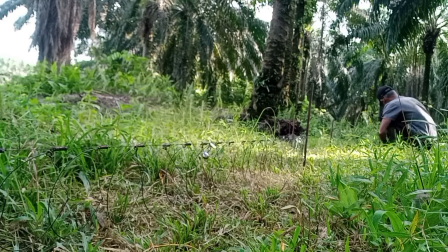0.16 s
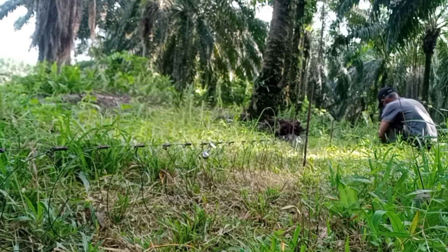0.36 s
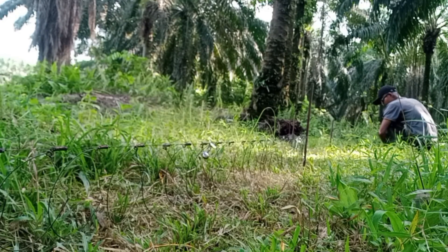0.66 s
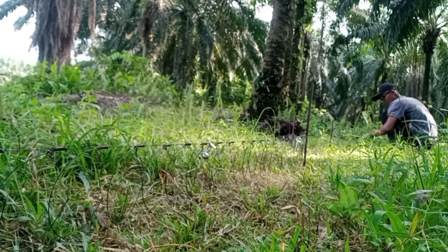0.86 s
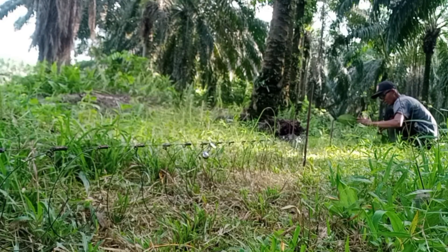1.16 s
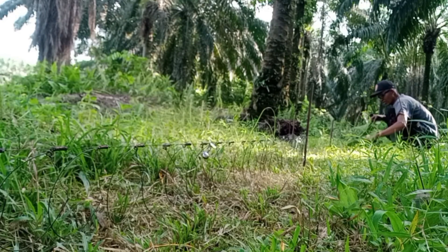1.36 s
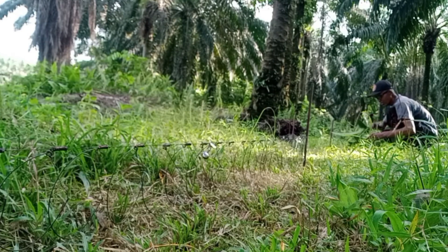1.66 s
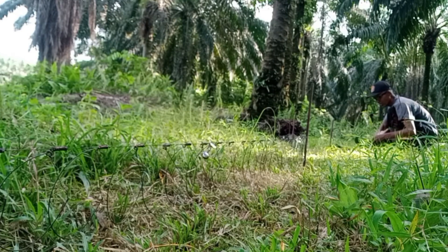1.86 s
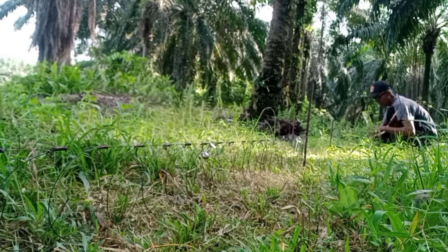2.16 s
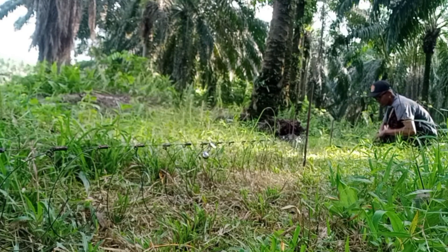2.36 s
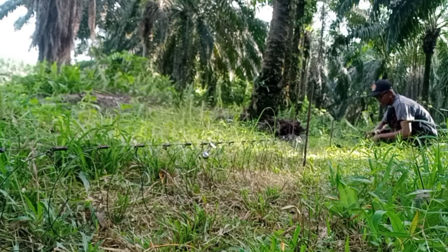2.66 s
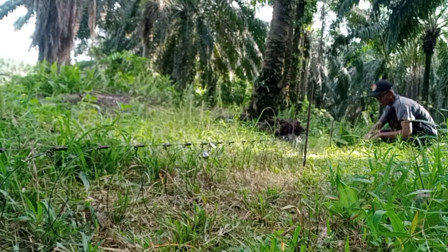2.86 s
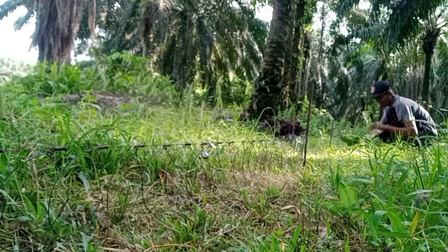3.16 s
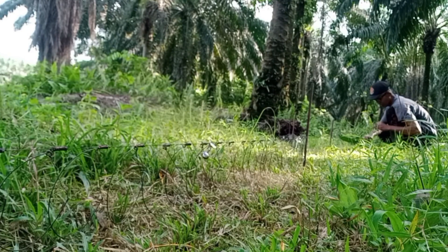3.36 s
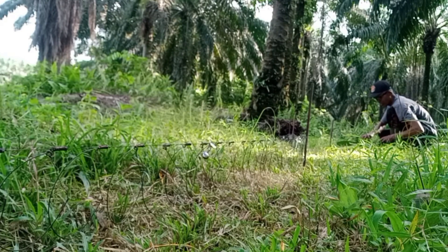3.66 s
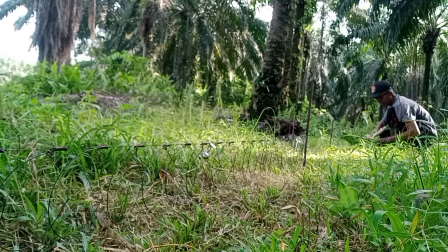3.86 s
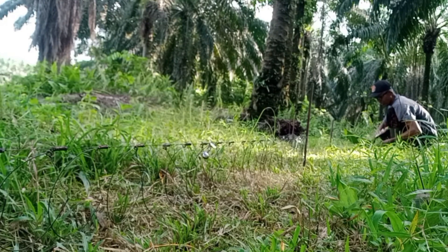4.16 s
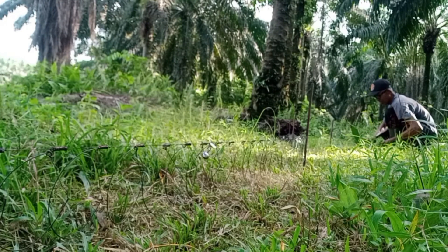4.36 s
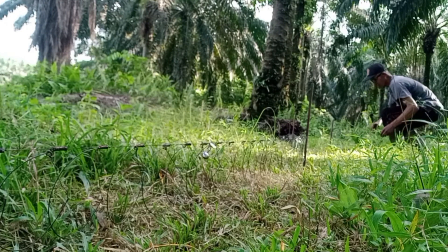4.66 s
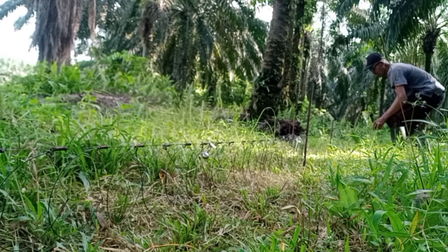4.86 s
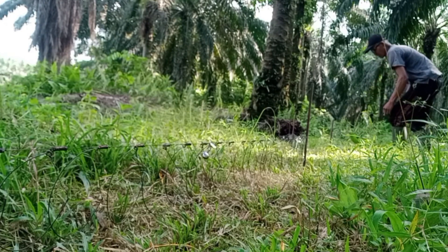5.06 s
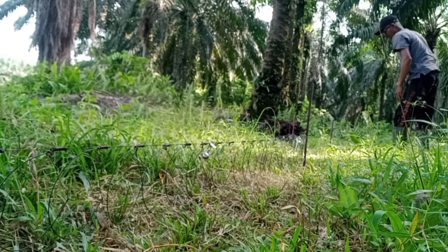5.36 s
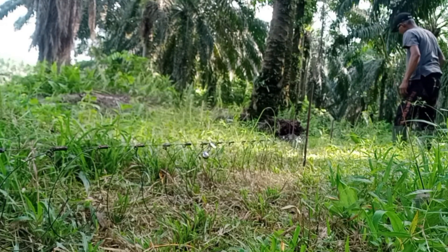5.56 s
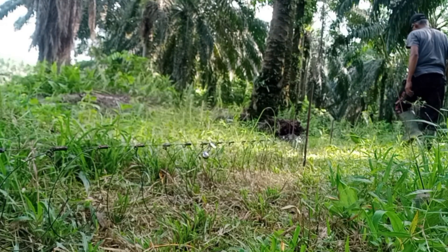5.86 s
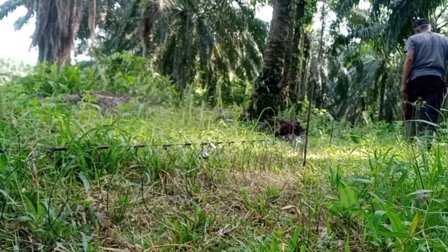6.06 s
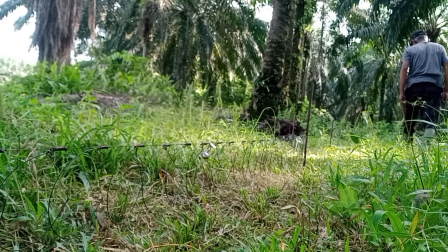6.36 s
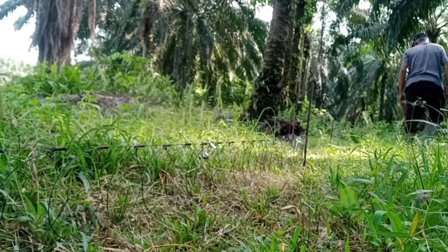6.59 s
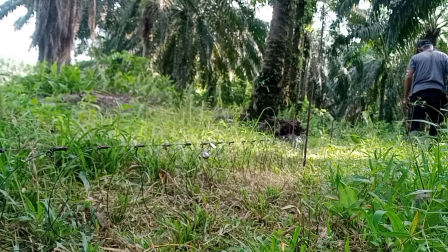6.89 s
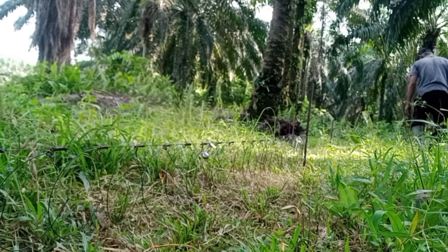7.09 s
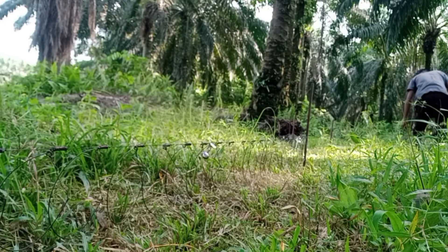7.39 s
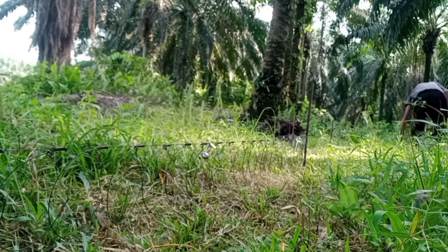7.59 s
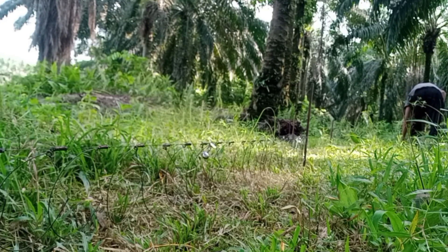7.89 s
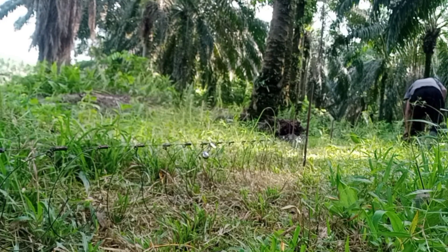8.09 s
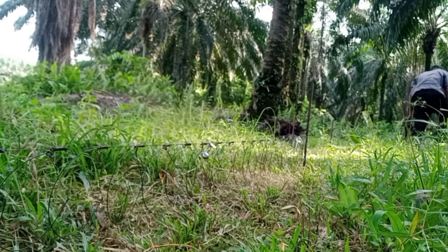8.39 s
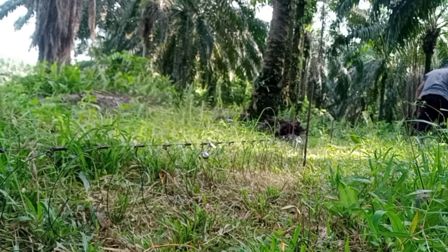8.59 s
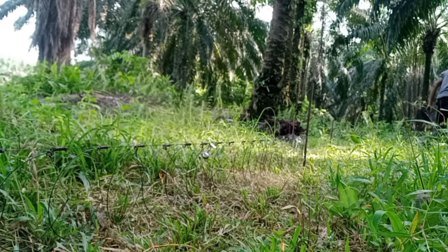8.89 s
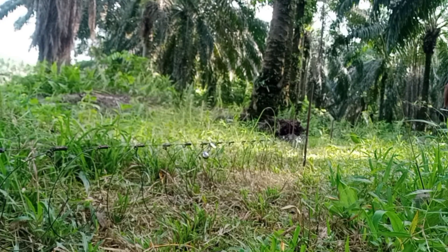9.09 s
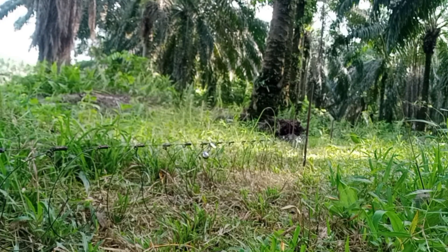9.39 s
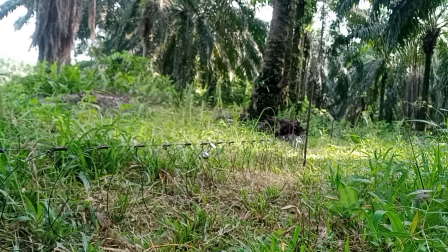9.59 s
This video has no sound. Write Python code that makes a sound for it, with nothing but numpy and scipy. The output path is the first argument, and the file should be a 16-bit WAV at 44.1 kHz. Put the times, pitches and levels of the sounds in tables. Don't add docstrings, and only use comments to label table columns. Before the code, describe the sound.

In an open palm plantation, a waterhen gives nine short, clear notes that each break upward, about two a second. After a brief gap it croaks rapidly in a long chatter that grows harsher and lasts to the end. A farther bird whoops in echo, small songbirds twitter, and cicadas, katydids and a chirping cricket never stop. Faint grass rustles early. The mono microphone stays still, with echoes off the trunks.

```python
import sys
import numpy as np
from scipy import signal
from scipy.io import wavfile
from scipy.ndimage import uniform_filter1d, map_coordinates

SR = 44100
rng = np.random.default_rng(int(sys.argv[2]) if len(sys.argv) > 2 else 0)


def to_wav(s):
    ch = np.atleast_2d(s).T
    pcm = np.round(np.clip(ch, -1, 1) * 32767)
    wavfile.write(sys.argv[1], SR, pcm.astype(np.int16))


def gain_from_decibels(decibels):
    exponent = np.asarray(decibels, float) / 20
    return 10 ** exponent


N = 429534

# pitch_hz, level_db (per Hz)
AIR_SPECTRUM = [(12, -40), (20, -10), (30, -29), (64, -2.5), (113, -1.5), (569, -13), (742, -13),
                (1240, -10), (1440, -10.5), (1920, -15), (4000, -16.5), (5200, -48.5), (8800, -120)]
# start_s, length_s, level_db, centre_hz
GRASS_BRUSHES = [(0.348, 0.15, -81.5, 253), (0.846, 0.26, -83, 450), (1.41, .06, -71, 1550),
                 (1.416, 0.18, -80, 3220), (1.865, 0.097, -73, 520), (1.934, 0.12, -86.5, 2370),
                 (2.643, 0.094, -70, 1350), (2.654, 0.084, -75.5, 620), (2.678, 0.071, -81.5, 2600),
                 (2.719, 0.11, -77, 950), (2.724, 0.21, -78.5, 3700), (2.803, 0.088, -67.5, 1400),
                 (2.842, 0.075, -77.5, 2500), (2.927, 0.12, -80.5, 750), (2.94, .12, -73.5, 1450),
                 (2.969, 0.086, -77, 2900), (4.205, 0.039, -78.5, 1450), (4.209, 0.073, -81, 2960),
                 (4.79, 0.0067, -63.5, 3480)]
# time_s, cicada_db, katydid_db
INSECT_LEVELS = [(0.0, -50.5, -60.5), (1.06, -51.5, -64.5), (1.08, -52, -69), (1.46, -52, -63.5),
                 (7.81, -50.5, -65), (9.74, -51, -61)]
# pitch_hz, level_db (per Hz)
CICADA_SPECTRUM = [(4000, -47), (4300, -23.5), (4650, -14), (5100, -21.5), (5550, -5), (6180, -23),
                   (6550, -6), (6800, 1.5), (7200, 3.5), (7600, 0), (8300, -12.5), (9900, -33.5),
                   (11000, -17), (12500, -37)]
# pitch_hz, level_db (per Hz)
KATYDID_SPECTRUM = [(7240, -59), (12300, -14.5), (13000, -17.5), (14000, 1.5), (14400, 2.5), (15000, 1),
                    (15600, -2.5)]
# start_s, pitch_hz, level_db, length_s, glide (share of pitch)
WHISTLES = [(0.006, 2620, -72, .05, .08), (0.105, 2220, -71, .035, 0), (0.452, 1930, -66, .03, .01),
            (0.462, 2300, -61, .035, 0), (0.45, 2720, -71, .05, -.03), (0.47, 2480, -72, .03, 0),
            (0.52, 2320, -68, .03, .01), (1.482, 1940, -76, .046, 0), (5.32, 4300, -66, .067, 0),
            (5.529, 3900, -66, .05, 0), (5.69, 3080, -72, .04, 0), (5.755, 3900, -66, .04, 0),
            (6.08, 1990, -70, .028, 0), (6.17, 3080, -71, .05, 0), (6.52, 4270, -61, .033, 0),
            (6.59, 3900, -68, .04, 0), (6.768, 4230, -66, .05, 0), (6.855, 4300, -60, .05, 0),
            (6.862, 2006, -65, .047, .04), (7.061, 3260, -57, .029, -.08), (8.008, 2900, -56, .05, .06),
            (8.02, 3260, -55, .088, 0), (8.098, 3790, -59, .06, 0), (8.117, 3200, -52, .065, -.04),
            (8.191, 3110, -51, .053, -.05), (8.295, 3170, -46, .041, 0), (8.375, 2630, -57, .05, 0),
            (8.494, 4250, -47, .024, .1), (8.52, 4350, -49, .03, 0), (8.513, 3310, -52, .035, -.03),
            (8.576, 3190, -46, .028, -.01), (8.7, 3100, -62, .06, 0), (8.73, 2640, -60, .03, 0),
            (8.78, 2380, -64, .06, 0), (8.881, 2100, -60, .05, 0), (9.05, 2084, -58, .03, 0)]
# start_s, length_s, level_db, lowest_hz, highest_hz
FLOCK_BOUTS = [(5.2, 5.9, -83.5, 2050, 3800), (8.36, .26, -66.5, 2250, 3050), (8.38, .14, -71, 3500, 4400),
               (5.24, .22, -75, 2900, 3600), (5.3, .3, -72, 3750, 4500), (5.62, .4, -72, 3700, 4500),
               (6.02, .46, -67, 3680, 4400), (6.3, .4, -77, 2200, 3300), (6.45, .4, -71, 4150, 4600),
               (6.84, .18, -67, 3650, 4500), (6.84, .16, -70, 2300, 3500), (7.36, .26, -74, 3000, 3650),
               (7.5, .5, -71, 3700, 4500), (8.02, .42, -55.5, 2500, 3500), (8.06, .3, -64.5, 3500, 4300),
               (8.5, .16, -59, 3950, 4600), (8.52, .2, -66, 3450, 3800), (8.58, .24, -60, 2850, 3400),
               (8.6, .32, -69, 2300, 2800)]
# start_s, strokes (count)
ODD_CHIRPS = [(0.007, 6), (0.459, 7), (1.061, 7), (1.222, 4), (1.353, 5), (1.491, 4), (1.631, 8), (1.78, 6),
              (2.222, 5), (2.343, 6), (2.646, 4), (2.79, 5), (3.081, 3), (3.209, 6), (3.648, 4), (3.783, 4),
              (4.487, 4), (4.618, 4), (4.913, 5), (5.194, 7), (5.785, 5), (6.803, 7), (7.411, 4), (7.53, 4),
              (7.668, 7), (8.111, 5), (8.271, 6), (8.407, 5), (9.433, 4), (9.586, 6)]
# start_s, level_db
WHOOP_CALLS = [
    (1.411, -60),
    (5.06, -56.5),
    (5.712, -57),
    (6.256, -57),
    (6.79, -55.5),
    (7.25, -56),
]
# start_s,
# peak_db, pitch_hz, third_overtone_db
CROAKS = [(5.242, -42, 304, -2), (5.324, -46, 296, 0.5), (5.42, -43, 291, -8), (5.507, -45, 285, -8),
          (5.572, -44.5, 293, -4.5), (5.663, -43, 286, -5.5), (5.751, -47, 280, -9),
          (5.829, -46, 279, -11), (5.914, -45.5, 287, -9), (5.999, -48.5, 259, -9),
          (6.082, -46.5, 277, -11), (6.167, -44, 291, -5), (6.256, -42, 291, -5.5),
          (6.344, -42, 285, -4.5), (6.424, -45, 285, -7), (6.522, -44, 268, -8),
          (6.592, -60, 290, 7.5), (6.692, -47, 265, -6), (6.756, -48.5, 310, -1.5),
          (6.859, -45, 278, -5), (6.945, -42, 286, -5), (7.05, -47, 267, -2.5), (7.144, -72, 316, 21),
          (7.207, -44, 291, -9), (7.273, -43.5, 275, -5), (7.352, -43, 283, -6),
          (7.436, -42.5, 297, -3), (7.517, -43.5, 302, -5.5), (7.612, -42.5, 283, -9.5),
          (7.698, -44.5, 288, -7),
          (7.765, -47.5, 290, -2.5), (7.825, -51.5, 304, -2.5), (7.875, -42, 315, 4.5),
               (7.936, -46, 318, 4.5), (8.014, -42, 309, -2), (8.093, -46.5, 313, 3), (8.173, -46, 321, 3),
               (8.271, -43.5, 315, 2.5), (8.324, -44, 316, 2.5), (8.378, -50.5, 309, 9),
               (8.5, -45, 303, -1.5), (8.553, -46, 294, 5), (8.614, -45.5, 293, 1.5),
               (8.724, -43, 293, -0.6), (8.783, -48, 278, -2), (8.879, -43, 302, -4),
               (8.941, -45, 301, 0.3), (9.041, -43.5, 293, -4), (9.099, -50, 312, 1.5),
               (9.199, -43.5, 289, -1.5), (9.265, -45, 281, 4), (9.361, -43, 282, 0.6),
               (9.423, -43.5, 294, 1.5), (9.524, -43.5, 285, 2.5), (9.592, -49, 290, 7.5),
               (9.696, -45, 269, 2.5)]
# time_s, resonance_hz, rasp_db
BILL = [(5.2, 1400, -50), (5.6, 1400, -51), (5.85, 1390, -45.5), (6.3, 1380, -48.5), (7.06, 1400, -44),
        (7.13, 1400, -56), (7.4, 1400, -48), (7.83, 1400, -56), (7.87, 1650, -46), (8.9, 1690, -40),
        (9.7, 1710, -36.5)]
# pitch_hz, level_db
THROAT_SPECTRUM = [(560, -24), (670, -2), (900, -5), (1100, -9), (1330, 2.5), (1500, -22), (1650, -50)]
# start_s, peak_db, upper_step_db, third_overtone_db, late_swell_db
RINGING_NOTE = (-.165, -43, 0, -26, 0)
# start_s, peak_db, upper_step_db, third_overtone_db, late_swell_db
TWO_STEP_NOTES = [
    (0.318, -40, 0, -28.5, 0.3),
    (0.821, -40, 0.5, -24.5, 0.8),
    (1.329, -38.5, -0.5, -29.5, 0.5),
    (1.831, -38.5, -0.5, -27.5, 0.2),
    (2.325, -38.5, 1, -28.5, 1),
    (2.829, -37, -1, -26, 0.8),
    (3.333, -37, 0, -26, 1.5),
    (3.838, -37.5, 0, -26, 0.5),
    (4.334, -37.5, -0.5, -22.5, 0.8),
]


def unit(x):
    return x / np.sqrt(np.mean(x ** 2) + 1e-20)


def curves(rows, t):
    s, *columns = np.transpose(rows)
    return [np.interp(t, s, column) for column in columns]


def wobble(rate, size=N):
    knots = rng.standard_normal(int(size * rate / SR) + 4)
    return map_coordinates(knots, [np.arange(size) * rate / SR])


def tone_phase(hz):
    return 2 * np.pi * np.cumsum(hz) / SR


def hiss(spectrum, patchy_db=0, size=N, order=9):
    hz, _, z = signal.stft(rng.standard_normal(size + 2048), SR, nperseg=1024)
    patches = uniform_filter1d(rng.standard_normal(z.shape), size=order, axis=0)
    patches = unit(uniform_filter1d(patches, size=4, axis=1))
    f, db = np.transpose(spectrum)
    colour_db = np.interp(np.log(hz + 1), np.log(f), db, left=-120, right=-120)
    coloured = z * gain_from_decibels(colour_db[:, None] + patchy_db * patches)
    return unit(signal.istft(coloured, nperseg=1024)[1][:size])


def hump(hz, width):
    return [(hz * (1 - 2 * width), -30), (hz * (1 - width), -6), (hz, 0),
            (hz * (1 + width), -9), (hz * (1 + 2 * width), -45)]


def swell_db(t, start, attack, hold, release, db):
    rise = np.clip((t - start) / attack, 0, 1)
    fall = np.clip((t - start - attack - hold) / release, 0, 1)
    shape = np.sin(np.pi / 2 * rise) * np.cos(np.pi / 2 * fall)
    return db + 20 * np.log10(shape ** 2 + 1e-4)


def add(track, s, x):
    start = round(s * SR)
    x = x[max(-start, 0):]
    part = track[max(start, 0):][:len(x)]
    part += x[:len(part)]


def echo(x, t60, onset, reach=1, lumps_db=0):
    t = np.arange(SR // 2) / SR
    shape = gain_from_decibels(-60 * t / t60) * (1 - np.exp(-t / onset)) * np.exp(-(t / reach) ** 4)
    tail = rng.standard_normal(len(t)) * shape * gain_from_decibels(lumps_db * wobble(45, size=len(t)))
    return signal.fftconvolve(x, tail / np.linalg.norm(tail))


def air_and_grass():
    out = gain_from_decibels(-79.5) * hiss(AIR_SPECTRUM, patchy_db=3)
    for s, length, db, hz in GRASS_BRUSHES:
        u = np.linspace(0, 1, max(round(length * SR), 64))
        crumbs = gain_from_decibels(db + 3 * wobble(150, size=len(u))) * np.sin(np.pi * u ** .6)
        brush = crumbs * hiss(hump(hz, width=.19), patchy_db=3, size=len(u), order=2)
        add(out, s, brush)
        add(out, s, gain_from_decibels(-3) * echo(brush, t60=.23, onset=.006))
    return out


def insects():
    cicada_db, katydid_db = curves(INSECT_LEVELS, np.arange(N) / SR)
    cicadas = gain_from_decibels(cicada_db + .35 * wobble(70)) * hiss(CICADA_SPECTRUM, patchy_db=1, order=2)
    bursts = unit(gain_from_decibels(1.9 * wobble(18) + 1.2 * wobble(37) + 1.5 * wobble(200)))
    return cicadas + gain_from_decibels(katydid_db) * bursts * hiss(KATYDID_SPECTRUM, patchy_db=-1)


def flock(low_hz, high_hz, level, count):
    size = len(level)
    homes_hz = np.linspace(low_hz, high_hz, count)
    weaker_db = 6 * np.linspace(-1, 1, count) ** 2
    voices = np.zeros(size)
    for home_hz, down_db in zip(homes_hz, weaker_db):
        pitch = home_hz * (1 + .012 * wobble(9, size=size) + .019 * wobble(250, size=size))
        voices += gain_from_decibels(5 * wobble(30, size=size) - down_db) * np.sin(tone_phase(pitch))
    return echo(level * unit(voices), t60=.2, onset=.004)


def songbirds():
    out = np.zeros(N)
    for s, hz, db, length, glide in WHISTLES:
        u = np.linspace(0, 1, max(round(length * SR), 64))
        pitch = hz * (1 + glide * (u - .5) + .021 * wobble(300, size=len(u)))
        whistle = gain_from_decibels(db) * np.sin(np.pi * u) ** .5 * np.sin(tone_phase(pitch))
        add(out, s, gain_from_decibels(.5) * whistle)
        add(out, s, gain_from_decibels(-1.5) * echo(whistle, t60=.33, onset=.003, lumps_db=2.5))
    for s, length, db, low_hz, high_hz in FLOCK_BOUTS:
        t = np.arange(SR * (int(length) + 1)) / SR
        level = gain_from_decibels(swell_db(t, 0, .03, .75 * length, .3 * length, db))
        add(out, s, flock(low_hz, high_hz, level, count=9))
    return out


def chirp_times(strokes_per_s):
    usual_strokes, rest_s = 6, .076
    usual_s = usual_strokes / strokes_per_s
    rows = []
    for (s, strokes), (due, _) in zip(ODD_CHIRPS, ODD_CHIRPS[1:]):
        end = s + strokes / strokes_per_s
        count = round((due - end - rest_s) / (usual_s + rest_s))
        rest = (due - end - count * usual_s) / (count + 1)
        rows.append((s, strokes))
        rows += [(end + rest + k * (usual_s + rest), usual_strokes) for k in range(count)]
    return rows + ODD_CHIRPS[-1:]


def cricket():
    strokes_per_s = 84
    out, t = np.zeros(N), np.arange(SR // 9) / SR
    for s, strokes in chirp_times(strokes_per_s):
        done = strokes_per_s * t / strokes
        stroke = np.sin(np.pi * strokes_per_s * t)
        beat = stroke * np.abs(stroke) * (done < 1) * np.minimum(1, .6 + 4 * done)
        sag_hz = 450 * (.5 - strokes_per_s * t % 1)
        ring = np.sin(tone_phase(5500 + 40 * done + sag_hz + 45 * wobble(170, size=len(t))))
        level_db = -47.6 + .7 * rng.standard_normal() + .88 * wobble(80, size=len(t))
        chirp = gain_from_decibels(level_db) * beat * ring
        add(out, s, chirp)
        add(out, s, gain_from_decibels(-6) * echo(chirp, t60=.083, onset=.0017))
    return out


def whoops():
    base_hz, rise_hz, rise_s, bend = 485, 285, .158, 1.08
    grows_db_per_s = 100
    out, t = np.zeros(N), np.arange(SR // 5) / SR
    hz = base_hz + rise_hz * np.sin(np.pi / 2 * np.minimum(t / rise_s, 1)) ** bend
    first_db = swell_db(t, start=0, attack=.01, hold=.065, release=.055, db=-3) + grows_db_per_s * t
    second_db = swell_db(t, start=.028, attack=.012, hold=.074, release=.036, db=7.5)
    second_db += .15 * grows_db_per_s * t
    phase = tone_phase(hz)
    first = gain_from_decibels(first_db + 1.5 * wobble(90, size=len(t))) * np.sin(phase)
    for s, db in WHOOP_CALLS:
        hoarse = phase + .28 * wobble(140, size=len(t))
        overtones = np.sin(2 * hoarse) + gain_from_decibels(-30.5) * np.sin(3 * hoarse) + gain_from_decibels(-36) * np.sin(4 * hoarse)
        upper = gain_from_decibels(second_db) * overtones
        first_echo = gain_from_decibels(-7.5) * echo(first, t60=.21, onset=.01)
        upper_echo = gain_from_decibels(5) * echo(upper, t60=.48, onset=.0063, reach=.5)
        add(out, s, gain_from_decibels(db) * (first + gain_from_decibels(-13) * upper))
        add(out, s, gain_from_decibels(db) * (first_echo + upper_echo))
    return out


def chatter():
    usual_db, rasp_shrinks = -45, .3
    open_buzz, shut_hz = .3, 1550
    throat_pull_hz, third_scoop, third_scoop_s = 295, .16, .011
    out, t = np.zeros(N), np.arange(SR // 22) / SR

    def swell(start, length, skew):
        return np.sin(np.pi * np.clip((t - start) / length, 0, 1) ** skew)

    for s, db, hz, third_db in CROAKS:
        turn, bend, drag = rng.uniform(size=3)
        bill_hz, rasp_db = curves(BILL, s)
        rasp_db -= rasp_shrinks * np.clip(db - usual_db, -5, 5)

        scoop = 1 + 5.5 * (bend - .55) * (t - .018)
        phase = 2 * np.pi * turn + tone_phase(hz * (scoop + .047 * wobble(204, size=len(t))))
        low = swell(.005, .025 + .006 * bend, .75) ** 2 * np.sin(phase)

        rise = 1 - third_scoop * (.4 + drag) * np.exp(-t / third_scoop_s) + .048 * wobble(204, size=len(t))
        throat = 2 * np.pi * bend + tone_phase((hz + throat_pull_hz) / 2 * rise)
        third_level = swell(.003, .031 + .01 * drag, .95) ** 1.3 * gain_from_decibels(2.6 * wobble(258, size=len(t)))
        voice = gain_from_decibels(db) * (low + gain_from_decibels(third_db) * third_level * np.sin(3 * throat))

        gate = swell(.001, .036, .68)
        lines = (1 - drag) * np.sin(4 * phase) + drag * np.sin(5 * phase + turn)
        grit = .9 * lines + .9 * hiss(THROAT_SPECTRUM, patchy_db=4, size=len(t), order=3)
        rasp = gain_from_decibels(rasp_db - 8.5) * gate * (1 + .25 * np.cos(phase)) * grit
        buzz = 1 + open_buzz * (bill_hz > shut_hz) * np.cos(phase)
        bill = gain_from_decibels(rasp_db - 12) * gate * buzz * hiss(hump(bill_hz, width=.085), size=len(t))

        start = s - .012
        add(out, start, voice + rasp + bill)
        add(out, start, gain_from_decibels(-16) * echo(voice, t60=.12, onset=.017, lumps_db=3))
        add(out, start, gain_from_decibels(-10) * echo(rasp, t60=.13, onset=.017))
        add(out, start, gain_from_decibels(-3.5) * echo(bill, t60=.3, onset=.004, lumps_db=3))
    return out


def two_step_notes():
    low_hz, high_hz, sag_hz_per_s = 858, 1250, 2300
    step_s, step_takes_s = .025, .036
    break_top_hz = 1060
    husk_db = -34
    lead_s = .012
    out, t = np.zeros(N), np.arange(SR // 8) / SR - lead_s
    step = np.sin(np.pi / 2 * np.clip((t - step_s) / step_takes_s, 0, 1)) ** 2
    hz = low_hz + (high_hz - low_hz) * step - sag_hz_per_s * np.maximum(t - step_s - step_takes_s, 0)
    low_db = swell_db(t, start=-.0095, attack=.013, hold=.031, release=.010, db=2)
    upper_db = swell_db(t, start=.0415, attack=.013, hold=.018, release=.021, db=10.4)
    break_db = swell_db(t, start=.032, attack=.008, hold=.009, release=.012, db=-4.5)
    half_db = np.maximum(break_db, np.maximum(low_db, upper_db - 18) + husk_db)
    late = np.clip((t - .062) / .01, -1, 1)
    for s, db, step_db, third_db, late_db in [RINGING_NOTE, *TWO_STEP_NOTES]:
        phase = tone_phase(hz * (1 + .0054 * wobble(90, size=len(t))))
        level = gain_from_decibels(low_db) + gain_from_decibels(upper_db + step_db + late_db * late)
        level = level * gain_from_decibels(.58 * wobble(120, size=len(t)))
        held = tone_phase(np.minimum(hz, break_top_hz))
        half = gain_from_decibels(half_db) * (np.sin(held / 2) + gain_from_decibels(-19) * np.sin(held * 3 / 2))
        clack_noise = hiss([(180, -14.5), (280, -4.5), (600, -16), (1700, -26.5)], size=len(t))
        clack = gain_from_decibels(half_db / 2 - 19.5) * clack_noise
        tone = gain_from_decibels(db) * (level * np.sin(phase) + half + clack)

        third_level = gain_from_decibels(db + upper_db + third_db - np.maximum(1215 - hz, 0) / 3)
        third = third_level * np.sin(3 * phase + .47 * wobble(250, size=len(t)))
        second_level = gain_from_decibels(db + upper_db - 53 + 2.1 * rng.standard_normal())
        second = second_level * np.sin(2 * phase + 1.9 * wobble(200, size=len(t)))

        start = s - lead_s
        tone_sent = tone * (.35 + .65 * step)
        add(out, start, tone + gain_from_decibels(-.5) * third)
        add(out, start, gain_from_decibels(-25.5) * echo(tone_sent, t60=.5, onset=.02, reach=.14, lumps_db=3))
        add(out, start, gain_from_decibels(2.5) * echo(third, t60=.6, onset=.0048, reach=.15, lumps_db=2.5))
        add(out, start, echo(second, t60=.8, onset=.04, reach=.11))
    return out


def scene():
    bed = air_and_grass() + insects()
    far_birds = songbirds() + whoops()
    waterhen = chatter() + two_step_notes()
    return (bed + far_birds + cricket() + waterhen)[None]


def band_limit(x):
    return signal.sosfilt(signal.butter(12, 16600, fs=SR, output="sos"), x)


def record(dry):
    return band_limit(dry)


dry = scene()
out = record(dry)
to_wav(out)
```